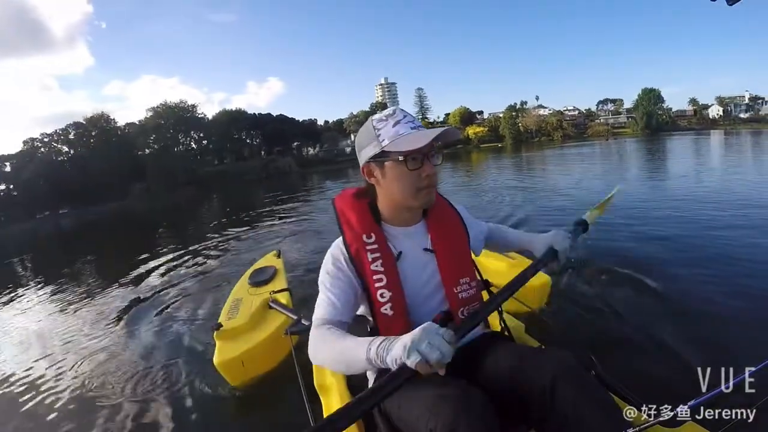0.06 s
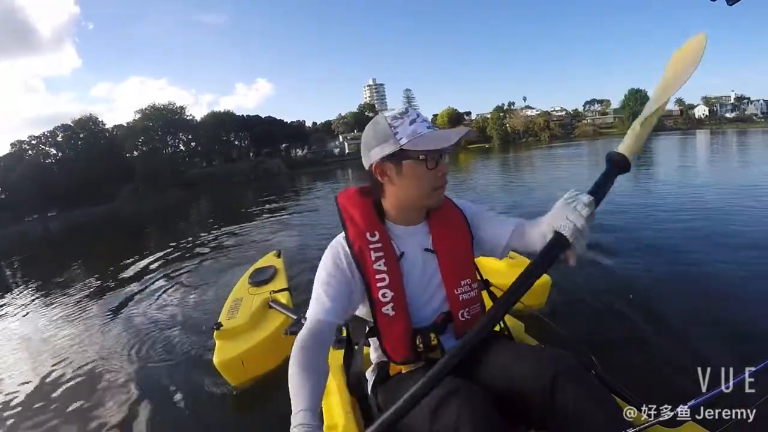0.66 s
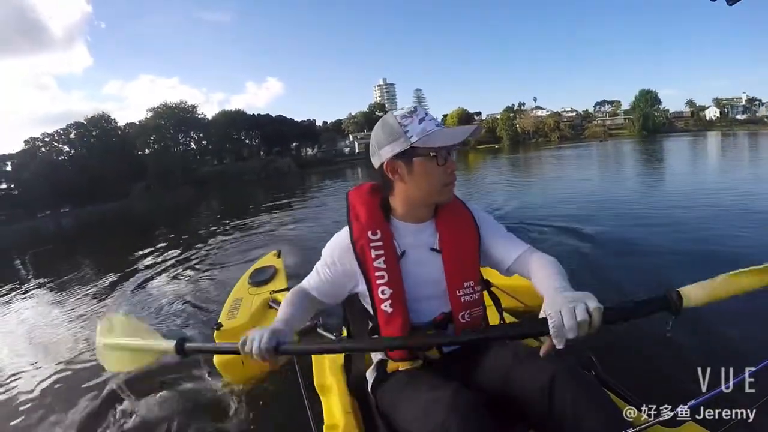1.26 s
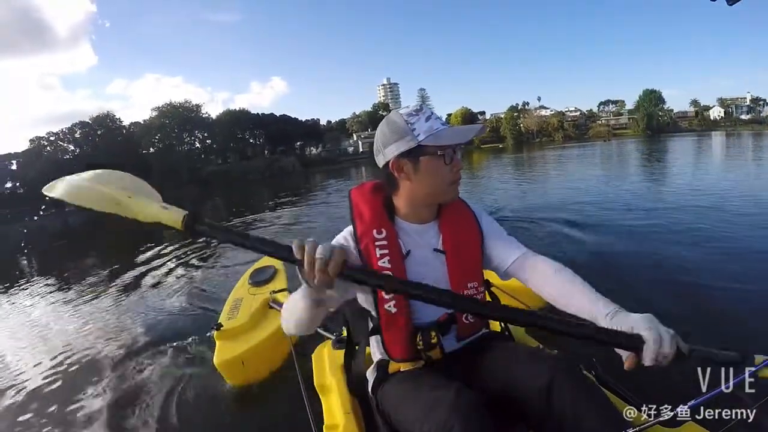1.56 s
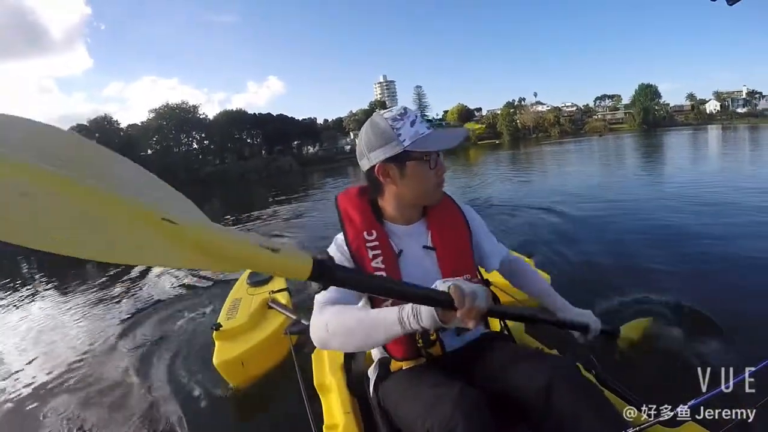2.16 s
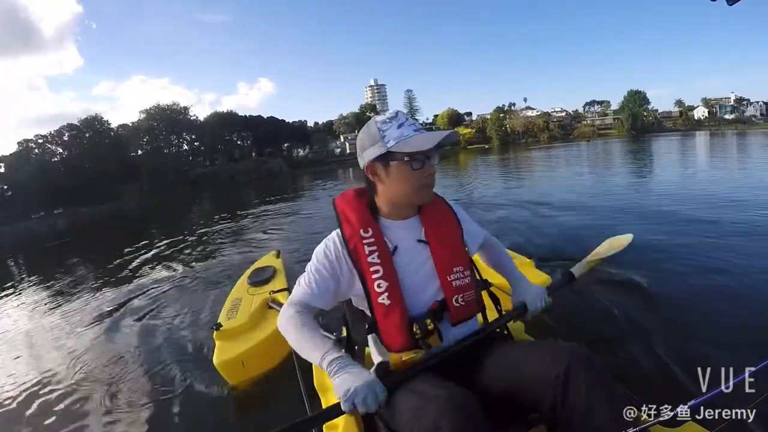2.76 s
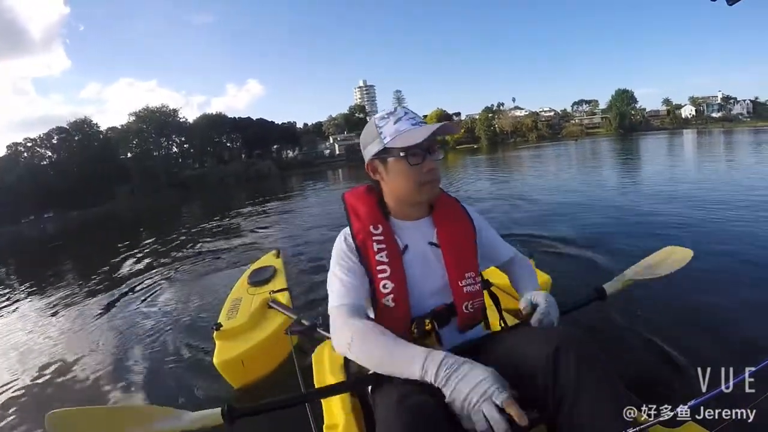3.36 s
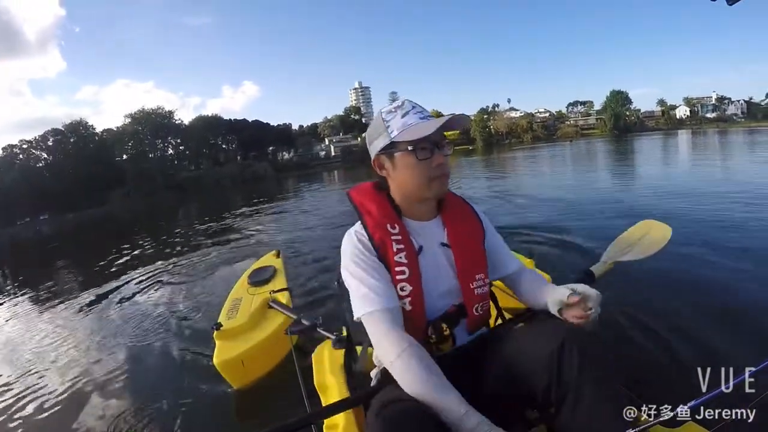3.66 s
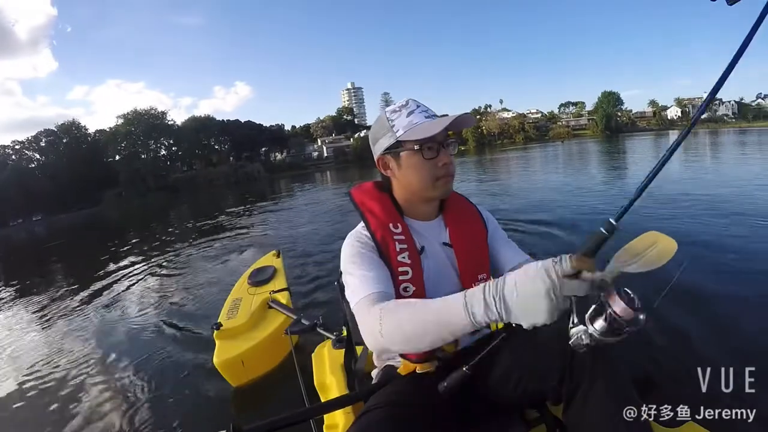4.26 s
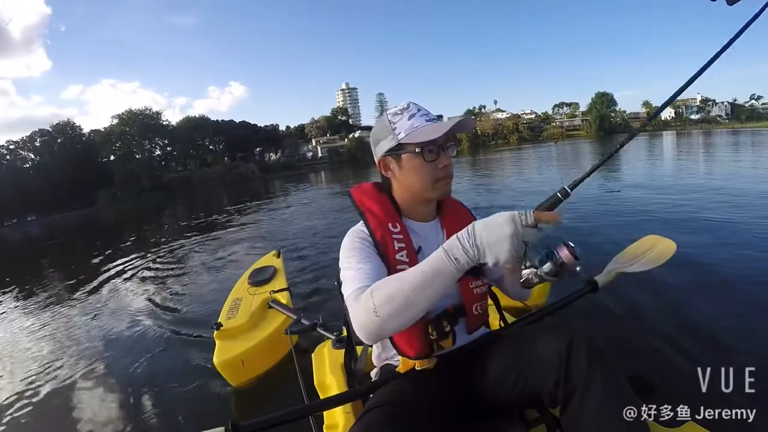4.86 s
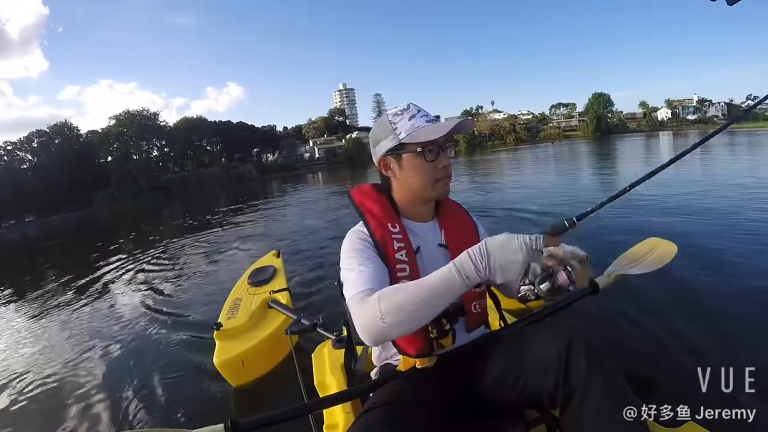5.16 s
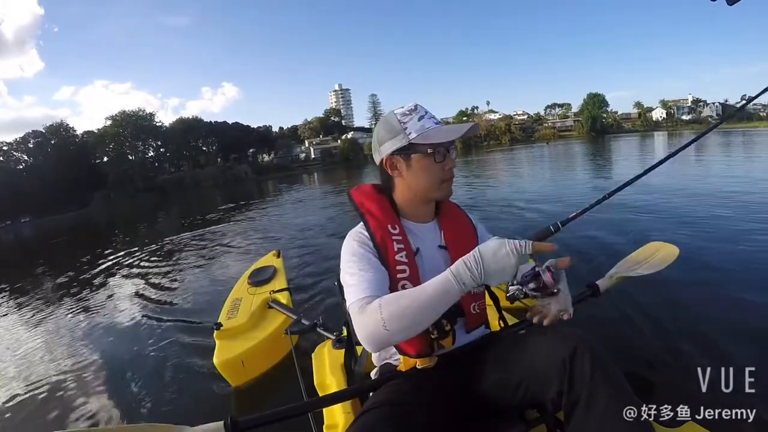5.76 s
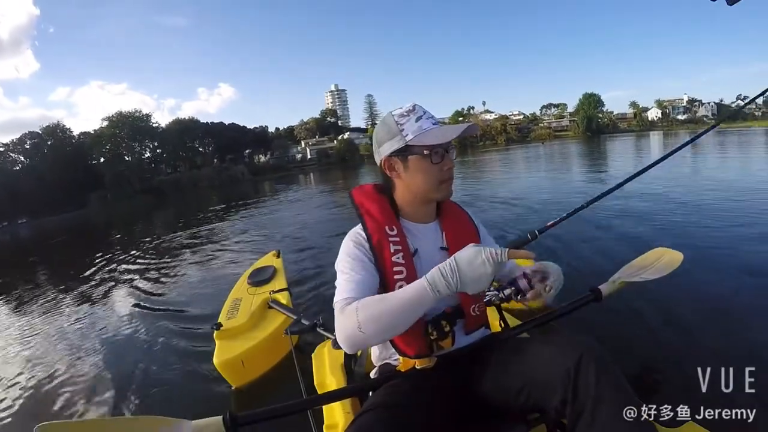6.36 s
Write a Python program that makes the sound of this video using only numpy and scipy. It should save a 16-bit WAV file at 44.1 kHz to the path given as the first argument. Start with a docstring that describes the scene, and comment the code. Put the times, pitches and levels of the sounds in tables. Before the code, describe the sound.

Gentle kayak paddle strokes drip and gurgle, then gear knocks hard on the hollow plastic hull and the boat drifts quietly.

```python
"""On a calm lake, a plastic kayak is heard from a camera mounted on its hull.
Two easy paddle strokes gurgle and drip: air trapped in the water rings as bubbles. A rod is picked up
and gear knocks hard on the hollow hull, exciting its normal modes; metal tackle jingles. The boat
drifts on with a low rocking rumble. Throughout, a faint insect chirps on the shore and the camera
adds its hiss and a faint pulsing whine."""
import sys
import numpy as np
from scipy import signal
from scipy.fft import rfft, irfft, next_fast_len
from scipy.io import wavfile
from scipy.ndimage import uniform_filter1d

SR = 44100
rng = np.random.default_rng(int(sys.argv[2]) if len(sys.argv) > 2 else 0)


def int16_out(signal):
    """Quantize to a 16-bit WAV file."""
    q = np.round(np.clip(np.atleast_2d(signal).T, -1, 1) * 32767)
    wavfile.write(sys.argv[1], SR, q.astype(np.int16))


N = 282681
TIME = np.arange(N) / SR

# Strokes and shifts of weight that rock the hull: t/s, duration/s, sway level/dB, wash level/dB
PUSHES = [(-.1, 0.41, -38, -46.5), (0.61, .14, -38.5, -60), (1.57, 0.3, -39, -44), (1.887, .42, -35, -47),
          (2.513, 0.055, -60, -49), (2.76, 0.47, -36, -46.5), (3.096, 0.077, -31.5, -40),
          (3.438, 0.55, -30.5, -41.5), (4.15, 0.35, -39, -78), (5.46, 0.067, -43, -59),
          (5.917, .06, -42, -69), (6.086, 0.28, -37, -69)]
# Spectrum of the swaying hull: f/Hz, relative level/dB
SWAY_SPECTRUM = [(12, -11.5), (26, 6), (40, -6), (55, -12.5), (78, -16), (100, -38), (150, -37.5),
                 (300, -72)]
# Spectrum of water washing along the hull: f/Hz, relative level/dB
WASH_SPECTRUM = [(40, -13.5), (80, 10.5), (110, 7), (155, 0.5), (210, 4), (270, -19.5), (370, -34.5),
                 (520, -13.5), (700, -32), (1500, -51.5)]
# Water running off a blade: t/s, duration/s, relative drip level/dB, relative spray level/dB
RUNOFFS = [(-.03, 0.26, -63.5, -65.5), (0.435, 0.051, -61.5, -66), (0.55, 0.062, -60, -65.5),
           (0.8, 0.09, -65, -58.5), (1, 0.34, -59, -58.5), (1.424, 0.26, -61.5, -65),
           (1.727, 0.3, -63, -66), (2.07, 0.13, -63, -62), (2.434, 0.19, -61, -61.5)]
# Spectrum of coarse drips and fizz: f/Hz, relative level/dB
DRIP_SPECTRUM = [(300, -34), (420, 11), (540, 3.5), (700, -0.5), (1020, 9), (1200, 3), (1650, 10),
                 (2550, 3.5), (3300, -12), (4800, -36), (6000, -19), (15000, -25)]
# Spectrum of fine spray: f/Hz, relative level/dB
SPRAY_SPECTRUM = [(2000, -12), (2550, 8.5), (3200, -5.5), (3800, 5.5), (4300, 2), (4900, 3.5), (6000, -3.5),
                  (6800, 1.5), (7500, -0.5)]
# Spectrum of the camera's hiss: f/Hz, relative level/dB
HISS_SPECTRUM = [(100, 5), (300, 5.5), (600, 0.5), (1200, -1), (3400, -4.5), (4100, -3), (5100, -5.5),
                 (5800, -4), (7800, -10), (9200, -12.5), (10000, -7), (10700, -12), (11400, -8),
                 (12200, -14), (15300, -17)]
# Wing resonances of the insect: f/Hz, rms level at the crest of a pip/dB
WING_RESONANCES = [(4000, -74), (4450, -75)]
# Single drops and their bubbles: t/s, peak level/dB, starting f/Hz, T60/s
DROPS = [(0.076, -40, 750, 0.096), (.082, -34, 545, 0.13), (0.094, -47, 530, 0.061),
         (0.142, -48, 4500, 0.013), (0.451, -39.5, 1840, 0.0081), (.513, -40.5, 2280, 0.03),
         (.515, -45.5, 4400, 0.017), (.534, -40.5, 1510, 0.03), (.605, -47.5, 2380, 0.044),
         (0.715, -43.5, 3760, 0.03), (.822, -46.5, 4780, 0.024), (.851, -44.5, 1405, 0.032),
         (0.872, -46.5, 4880, 0.051), (.901, -49, 2510, 0.054), (1.076, -43, 4750, 0.021),
         (1.136, -47, 4700, 0.014), (1.234, -39.5, 2700, .005), (1.305, -43, 3720, 0.02),
         (1.409, -47, 2470, .025), (1.498, -49, 2790, 0.038), (1.554, -48.5, 1030, 0.084),
         (1.574, -46.5, 4770, 0.019), (1.792, -44.5, 1664, 0.053), (1.829, -37.5, 3850, 0.0065),
         (1.857, -38, 1555, 0.029), (1.892, -49, 2370, 0.041), (2.129, -50, 2470, .057),
         (2.385, -51.5, 2550, .032), (2.625, -49, 3750, .015), (2.74, -49, 4780, .017),
         (2.774, -45.5, 2780, 0.0056)]
# Air folded under by a blade or by a ripple at the hull: t/s, rms level/dB, f/Hz, duration/s
GULPS = [(0.082, -49.5, 930, 0.016), (0.16, -57.5, 686, 0.033), (0.574, -57.5, 1700, .027),
         (0.586, -48.5, 1110, 0.017), (.62, -49, 160.4, 0.0294), (.69, -42, 80, 0.049),
         (0.754, -61, 2000, 0.034), (.9, -61.5, 545, 0.028), (1.025, -57.5, 2370, 0.021),
         (1.166, -59, 1880, 0.067), (1.307, -58, 754, 0.042), (1.448, -60, 795, .025),
         (1.569, -60, 795, .04), (1.998, -35, 102, 0.024), (2.217, -59.5, 720, 0.052),
         (2.408, -52, 1210, .021), (2.425, -54.5, 534, 0.049), (2.444, -55.5, 1040, .025),
         (2.539, -54, 630, .039), (2.597, -60.5, 855, .023), (2.944, -51, 1220, 0.01),
         (2.946, -54, 570, 0.012), (5.849, -65, 543, 0.047), (6.108, -36, 67.4, .07)]
# Normal modes of the hull and camera mount: f/Hz, relative level/dB, T60/s
HULL_MODES = [(23.44, -5.5, 1), (63.57, -9, 0.46), (81.3, -6, 0.41), (140.7, -16.5, 0.23),
              (167.8, -19, 0.13), (213.5, -8.5, 0.2), (269.6, -17, 0.097), (370, -29, 0.065),
              (461, -34, 0.19), (494, -23, 0.095), (556, -17, 0.082), (639, -28, 0.064), (731, -26, 0.09),
              (893.5, -14, 0.033), (1027, -24, 0.062), (1081, -23, 0.083), (1265, -36, 0.067),
              (1399, -32, 0.096), (1780, -21, .036), (1910, -39.5, 0.2), (1895, -13.5, .028),
              (2010, -22.5, .04), (2170, -26.5, 0.022), (2420, -28.5, 0.027)]
# Air pockets collapsing behind a blade: t/s, peak level/dB, first f/Hz, last f/Hz, duration/s
EDDIES = [(.27, -41, 165, 138, 0.12), (1.655, -31.5, 153, 123, 0.094), (2.841, -35.5, 130.5, 159, 0.09)]
# Blows on the hull: t/s, relative level/dB, cutoff f/Hz, boom gain/dB, panel gain/dB, sliding time/s
KNOCKS = [(3.162, -37, 880, 5, 12.5, 0.018), (3.209, -43, 1430, 14.5, 11, 0.039),
          (3.24, -49, 560, 6.5, 21, 0.012), (3.309, -42.5, 630, 8.5, 11.5, 0.011),
          (3.511, -33.5, 1650, 14.5, 3.5, 0.063), (3.544, -27, 2080, 6.5, -0.5, 0),
          (3.554, -25.5, 810, 5.5, 3.5, 0.018), (3.618, -37, 810, 14, 5, 0.012),
          (3.695, -38, 1480, 10.5, 1, 0.052), (3.777, -13.5, 2033, 2, 0.5, 0.0051),
          (3.838, -21.5, 1260, 10, 0, .018), (3.8742, 1.5, 11900, -9, 0, 0.0011),
          (3.8935, -6, 1020, 6.5, -0.5, 0.0021)]


def undb(db):
    """Amplitude ratio of a level in decibels."""
    return 10 ** (np.asarray(db) / 20)


def unit(x):
    """Normalisation to unit rms."""
    return x / np.sqrt(np.mean(x ** 2) + 1e-20)


def colour(x, spectrum):
    """Spectral shaping by (f/Hz, level/dB) points, at unit rms."""
    hz, db = np.transpose(spectrum)
    size = next_fast_len(N)
    f = np.maximum(np.arange(size // 2 + 1) * SR / size, 1)
    gain = undb(np.interp(np.log(f), np.log(hz), db))
    return unit(irfft(rfft(x, size) * gain, size)[:N])


def band(x, lo_hz, hi_hz, order=2):
    """Band-pass filtering."""
    return signal.sosfilt(signal.butter(order, [lo_hz, hi_hz], "band", fs=SR, output="sos"), x)


def add(out, s, sound):
    """Superposition of a sound that starts at time s."""
    i = max(int(s * SR), 0)
    out[i:i + len(sound)] += sound[:max(len(out) - i, 0)]


def swells(events, rise_s, fall_s):
    """Incoherent addition: (t/s, duration/s, level/dB) envelopes rise, hold, decay and sum in power."""
    power = np.zeros(N)
    for s, length, db in events:
        age = TIME - s
        rise = np.clip(age / rise_s, 0, 1)
        fall = np.exp(-np.maximum(age - length, 0) / fall_s)
        power += (undb(db) * rise * fall) ** 2
    return np.sqrt(power)


def rocking(rise_s=0.066, ripple_sway_db=-49.5, ripple_wash_db=-66, wake_s=4.8, wake_db=-60.5):
    """Forced motion: pushes sway the hull and wash water along it; ripples keep both going."""
    s, length, sway_db, wash_db = np.transpose(PUSHES)
    sway = swells(zip(s, length, sway_db), rise_s, fall_s=0.24)
    wash = swells([*zip(s, length, wash_db), (0, wake_s, wake_db)], rise_s, fall_s=0.081)
    return (np.hypot(sway, undb(ripple_sway_db)) * colour(rng.standard_normal(N), SWAY_SPECTRUM)
            + np.hypot(wash, undb(ripple_wash_db)) * colour(rng.standard_normal(N), WASH_SPECTRUM))


def bubble(hz, t60, glide=0.065):
    """Damped oscillation: an air pocket rings, rising in pitch as it nears the surface."""
    t = np.arange(int(t60 * SR) + 2) / SR
    phase = 2 * np.pi * hz * t * (1 + glide * t / t60 / 2)
    return np.sin(phase) * np.exp(-np.log(1000) * t / t60)


def patter(lo_hz, hi_hz, cycles, scatter_db, count, wet_s=3.2):
    """Random superposition: tiny bubbles ring while the paddle is wet, a few far above the rest."""
    out = np.zeros(N)
    for when, size, chance in rng.random((count, 3)):
        hz = lo_hz * (hi_hz / lo_hz) ** size
        db = -scatter_db * np.log(max(chance, 0.03))
        add(out, when * wet_s, undb(db) * bubble(hz, cycles / hz))
    return out


def trickle(coarse_db=-6, fine_db=-5, fizz_db=-10, mist_db=-2, rise_s=0.04):
    """Drainage: drips, spray and the fizz of disturbed water die away exponentially as a blade drains."""
    s, length, drip_db, spray_db = np.transpose(RUNOFFS)
    drip = swells(zip(s, length, drip_db), rise_s, fall_s=0.22)
    spray = swells(zip(s, length, spray_db), rise_s, fall_s=0.24)
    coarse = colour(patter(480, 2740, cycles=110, scatter_db=5.0, count=1500), DRIP_SPECTRUM)
    fine = colour(patter(2240, 7280, cycles=100, scatter_db=7.5, count=3400), SPRAY_SPECTRUM)
    fizz = colour(rng.standard_normal(N), DRIP_SPECTRUM)
    mist = colour(band(rng.standard_normal(N), 2200, 6800), SPRAY_SPECTRUM)  # droplets merge into noise
    fine = unit(fine + undb(mist_db) * mist)
    return drip * (undb(coarse_db) * coarse + undb(fizz_db) * fizz) + spray * undb(fine_db) * fine


def insect(rate_hz=12.0, width_hz=180, sharpness=12, uneven=0.15):
    """Amplitude modulation: the wing resonances, narrow bands of noise, sound in slightly uneven pips."""
    pace_hz = rate_hz * (1 + uneven * colour(rng.standard_normal(N), [(4, 5), (12, -63)]))
    pips = (0.5 + 0.5 * np.cos(2 * np.pi * np.cumsum(pace_hz) / SR)) ** sharpness
    wings = sum(undb(db) * unit(band(rng.standard_normal(N), hz - width_hz / 2, hz + width_hz / 2))
                for hz, db in WING_RESONANCES)
    return pips * wings


def camera(whine_hz=8570, whine_db=-63.5, frame_hz=59.94, duty=0.47, swing=0.12, hiss_db=-64):
    """Self-noise: steady hiss, and a tone gated once a frame in long and short bursts by turns."""
    frame = (TIME - 0.0036) * frame_hz
    nearest = np.round(frame)
    burst = abs(frame - nearest) < (duty - swing * np.cos(np.pi * nearest)) / 2
    gate = uniform_filter1d(burst.astype(float), size=70)
    phase_drift = 0.032 * np.cumsum(rng.standard_normal(N))  # the oscillator wanders slightly
    whine = gate * np.sin(2 * np.pi * whine_hz * TIME + phase_drift)
    return undb(whine_db) * whine + undb(hiss_db) * colour(rng.standard_normal(N), HISS_SPECTRUM)


def drops(splat_db=-11, splat_s=0.0074, sharp_hz=2400):
    """Air entrainment: each drop leaves a ringing bubble; small ones also smack the surface."""
    out = np.zeros(N)
    t = TIME[:SR // 20]
    for s, db, hz, t60 in DROPS:
        splat = unit(band(rng.standard_normal(len(t)), 2200, 3500, order=1)) * np.exp(-t / splat_s)
        smallness = min(hz / sharp_hz, 1) ** 2
        add(out, s, undb(db) * bubble(hz, t60))
        add(out, s, undb(db + splat_db) * smallness * splat)
    return out


def hull_modes(build_cycles=0.52):
    """Free vibration: each normal mode of the hull is a damped sinusoid, one to a row."""
    t = TIME[:SR]
    hz, db, t60 = np.transpose(HULL_MODES)[:, :, None]
    side = (-1) ** np.arange(len(HULL_MODES))[:, None]  # neighbours move the mount in opposite senses
    build = 1 - np.exp(-t * hz / build_cycles)  # slow modes take a moment to spread along the boat
    return side * undb(db) * build * np.sin(2 * np.pi * hz * t) * np.exp(-np.log(1000) * t / t60)


def gulps(count=12, spread=0.26, cycles=13, fade=0.8, hull_db=-1):
    """Airborne and structure-borne sound: a gulp breaks into like-sized bubbles, heard by both paths."""
    out = np.zeros(N)
    modes, mode_hz = hull_modes(), np.array(HULL_MODES)[:, 0]
    for s, db, hz, length in GULPS:
        cloud = np.zeros(SR // 2)
        for k, (when, size) in enumerate(rng.random((count, 2))):
            progress = max(k - when, 0) / count
            bubble_hz = hz * np.exp(spread * (2 * size - 1))
            ring = bubble(bubble_hz, t60=min(cycles / bubble_hz, 0.13))
            add(cloud, progress * length, np.exp(-fade * progress) * ring)
        within_octave = abs(np.log2(mode_hz / hz)) < 1
        through_hull = signal.fftconvolve(cloud, modes[within_octave].sum(axis=0))[:len(cloud)]
        gulp = unit(cloud) + undb(hull_db) * unit(through_hull)
        rms = np.sqrt(np.sum(gulp ** 2) / (length * SR))
        add(out, s, undb(db) * gulp / rms)
    return out


def eddies():
    """Cavity resonance: a large air pocket collapses in a blade's eddy with a hollow, gliding glug."""
    out = np.zeros(N)
    for s, db, first_hz, last_hz, length in EDDIES:
        progress = np.linspace(0, 1, int(length * SR))
        phase = 2 * np.pi * np.cumsum(first_hz + (last_hz - first_hz) * progress) / SR
        add(out, s, undb(db) * np.sin(np.pi * progress) ** 2 * np.sin(phase))
    return out


def knocks(boom_hz=115, panel_hz=330, vary_db=0.94, rattle_db=-26, rattle_s=0.012):
    """Impact excitation of the hull's modes: soft contact omits the high ones, sliding smears them."""
    out = np.zeros(N)
    t = TIME[:SR]
    modes, hz = hull_modes(), np.array(HULL_MODES)[:, :1]
    for s, db, cutoff_hz, boom_db, panel_db, slide_s in KNOCKS:
        rings = modes * undb(vary_db * rng.standard_normal(hz.shape) + boom_db * (hz < boom_hz))
        body = np.sum(rings * (hz < panel_hz), axis=0)
        panels = np.sum(rings * (hz >= panel_hz), axis=0)
        loose_fittings = unit(band(rng.standard_normal(SR), 540, 2400, order=5)) * np.exp(-t / rattle_s)
        panels = panels + crack() + undb(rattle_db) * loose_fittings
        force = 0.047 * rng.standard_normal(SR) * np.exp(-t / max(slide_s, 1 / SR))  # many small slips
        force[0] = 1  # the first touch
        panels = signal.fftconvolve(panels, force / np.linalg.norm(force))[:SR]
        contact = signal.butter(4, cutoff_hz, fs=SR, output="sos")
        add(out, s, undb(db) * (body + undb(panel_db) * signal.sosfilt(contact, panels)))
    return out


def crack(snap_db=-36.5, edge_db=-49, decay_s=0.004):
    """A brief transient has a broad spectrum: hard plastic snaps, with a faint bright edge."""
    noise = rng.standard_normal(SR)
    snap = unit(band(noise, 3400, 6600, order=4))
    edge = unit(band(noise, 4200, 17000))
    return np.exp(-TIME[:SR] / decay_s) * (undb(snap_db) * snap + undb(edge_db) * edge)


def tackle(start_s=3.89, jingle_db=-55, settle_s=0.073, lo_hz=3900, hi_hz=5200, count=34):
    """Damped ringing: small metal tackle shivers after the hardest blow, its pings thinning out."""
    out = np.zeros(N)
    for when, size, force in rng.random((count, 3)):
        age = 2 * settle_s * when ** 2
        ping = bubble(lo_hz + size * (hi_hz - lo_hz), t60=0.028, glide=0)
        add(out, start_s + age, undb(jingle_db) * force * np.exp(-age / settle_s) * ping)
    return out


def scene():
    """Linear superposition of water, shore, camera and hull in one channel."""
    return (rocking() + trickle() + insect() + camera()
            + drops() + gulps() + eddies() + knocks() + tackle())[None]


def record(dry, cutoff_hz=15350):
    """Band limiting: the camera's steep low-pass filter removes the highest treble."""
    return signal.sosfilt(signal.ellip(10, 0.1, 80, cutoff_hz, fs=SR, output="sos"), dry)


dry = scene()
out = record(dry)
int16_out(out)
```